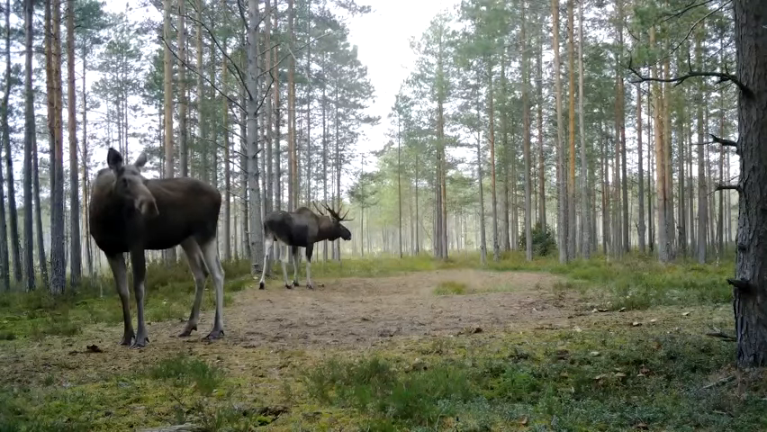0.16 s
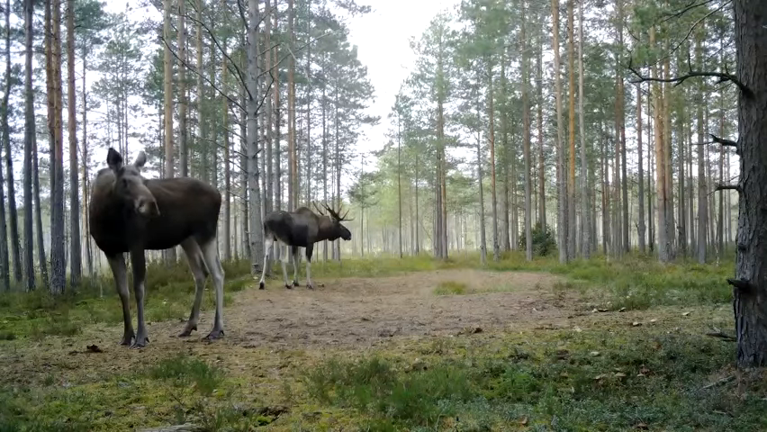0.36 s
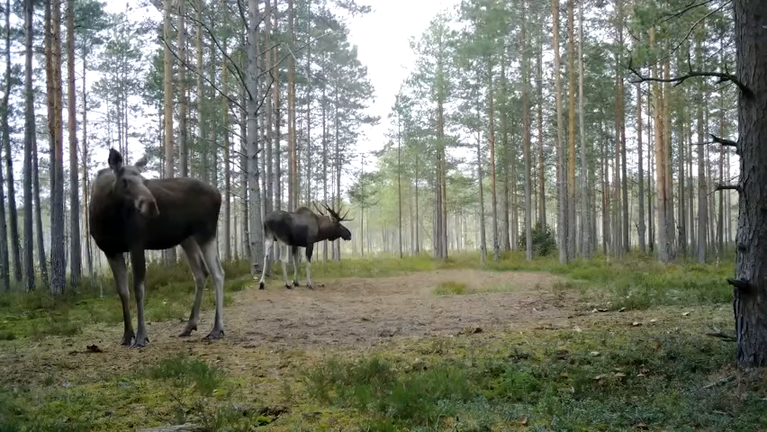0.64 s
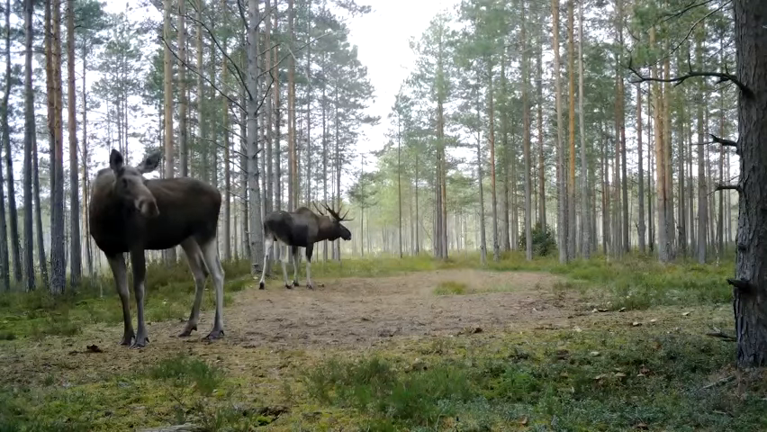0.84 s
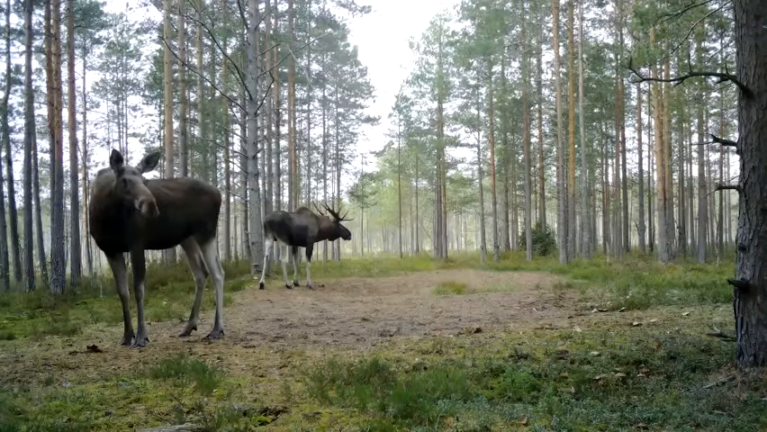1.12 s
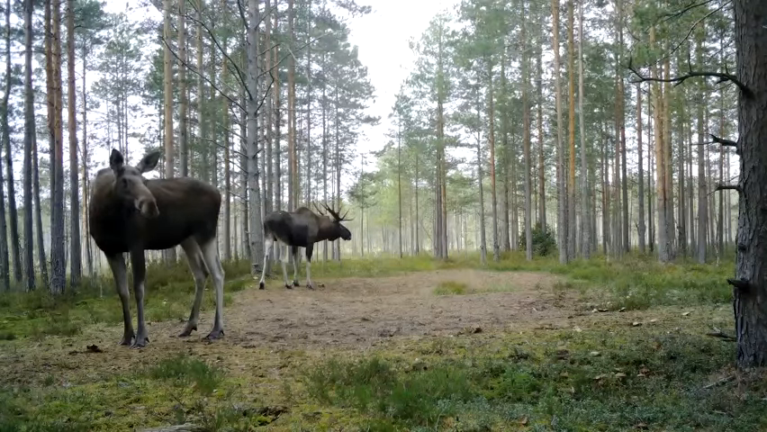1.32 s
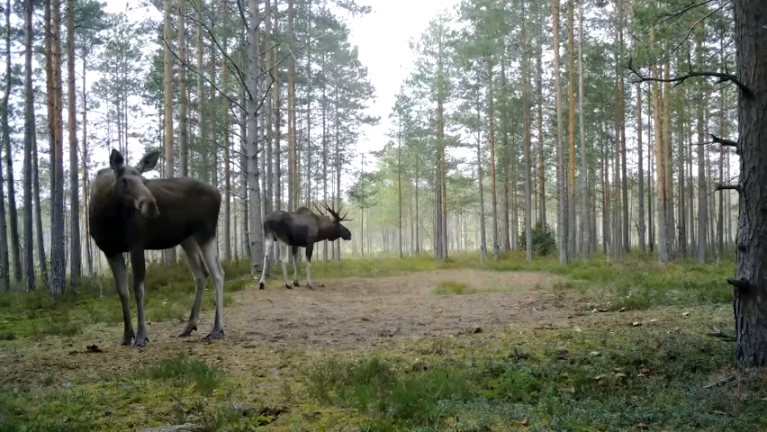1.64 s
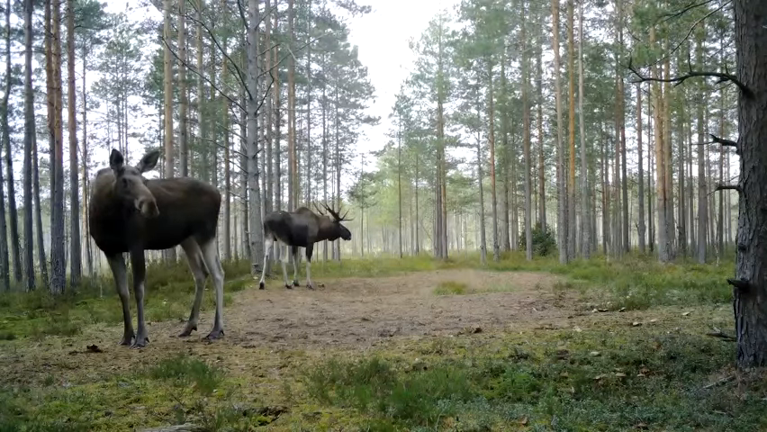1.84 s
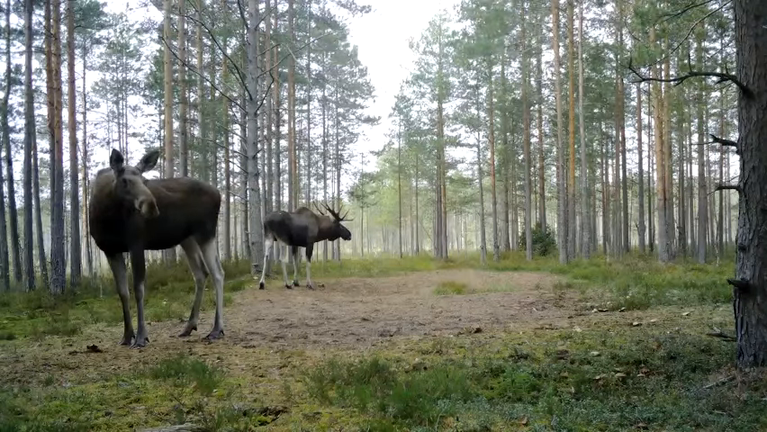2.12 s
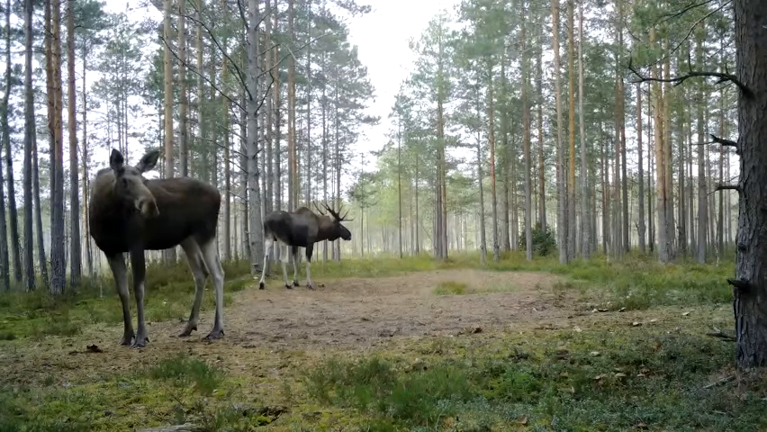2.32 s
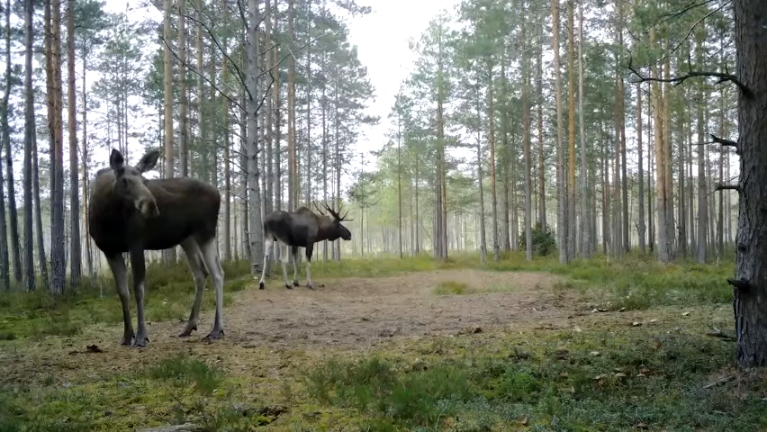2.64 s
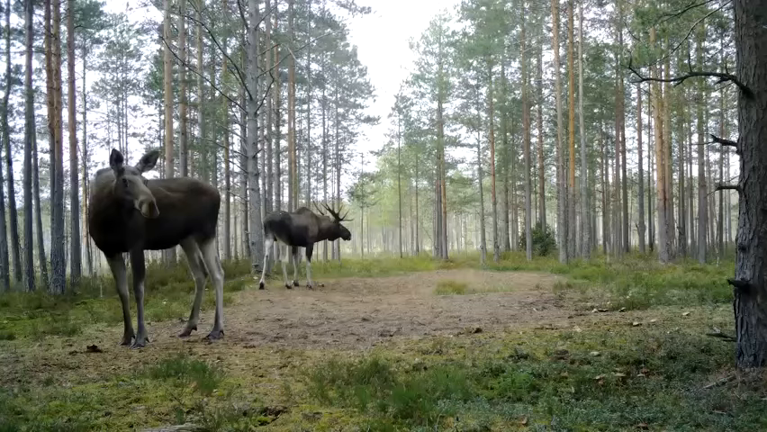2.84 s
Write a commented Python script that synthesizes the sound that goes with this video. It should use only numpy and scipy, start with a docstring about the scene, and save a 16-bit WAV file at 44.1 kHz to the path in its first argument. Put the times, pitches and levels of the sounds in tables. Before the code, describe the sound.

Low, lumpy wind noise dominates, pressing on the microphone in an open pine forest. Faint treetop hiss stays behind it, three brief hoarse croaks echo among trunks in the first half, and small ticks accompany late heavy thuds.

```python
"""Deep, lumpy wind buffets the microphone in a pine forest, while the tree crowns hush steadily with some hiss.
Three short rattling croaks, probably of a distant raven, ring among the trunks.
There are a few small ticks, the late ones clicks of the recorder's gain stepping after hard pushes of wind.
Wind, crowns and ticks are shaped noise; each croak is a row of noisy pulses sent through throat resonances.
The hardest pushes of wind overload the input and make the gain control duck."""
import sys
import numpy as np
from scipy import signal
from scipy.fft import rfft, irfft, next_fast_len
from scipy.io import wavfile
from scipy.ndimage import uniform_filter1d

SR = 44100
rng = np.random.default_rng(int(sys.argv[2]) if len(sys.argv) > 2 else 0)


def waveform_to_disk(signal):
    """Save audio, clipped to [-1, 1], as 16-bit WAV at the path in sys.argv[1]."""
    frames = np.transpose(np.atleast_2d(signal))
    scaled = np.clip(frames, -1, 1) * 32767
    samples = np.round(scaled).astype(np.int16)
    wavfile.write(sys.argv[1], SR, samples)


N = 130977   # length in samples


def amp(db):
    """Turns decibels into a gain."""
    return 10 ** (np.asarray(db, float) / 20)


def unit(x):
    """Scales a sound to an rms level of 1."""
    return x / np.sqrt(np.mean(x ** 2) + 1e-20)


def in_time(rows):
    """Draws straight lines between the points of a (time, value) table, giving one value per sample."""
    times_s, values = np.transpose(rows)
    return np.interp(np.arange(N) / SR, times_s, values)


def coloured(points, low_hz=0, high_hz=np.inf):
    """Noise with the given spectrum, falling away beyond its ends; optionally one slice of it."""
    size = next_fast_len(N)
    hz = np.maximum(np.arange(size // 2 + 1) * SR / size, 1)
    table = np.array(points, float)
    db = np.interp(np.log(hz), np.log(table[:, 0]), table[:, 1])
    # 24 dB per octave below the first point and above the last
    db -= 24 * np.maximum(np.log2(table[0, 0] / hz), 0)
    db -= 24 * np.maximum(np.log2(hz / table[-1, 0]), 0)
    in_slice = (hz >= low_hz) * (hz < high_hz)
    spectrum = rfft(rng.standard_normal(size)) * amp(db) * in_slice
    return irfft(spectrum, size)[:N]


def steady(x, span_s):
    """Evens out the slow chance swells of a narrow noise by dividing by its local rms level."""
    span = int(span_s * SR)
    power = uniform_filter1d(uniform_filter1d(x ** 2, span), span)
    return x / np.sqrt(power + 1e-12)


def resonance(x, hz, width_hz):
    """Rings at one pitch: a two-pole band-pass with a gain of about 1 at its top."""
    r = np.exp(-np.pi * width_hz / SR)
    feedback = [1, -2 * r * np.cos(2 * np.pi * hz / SR), r * r]
    return signal.lfilter([(1 - r * r) / 2, 0, (r * r - 1) / 2], feedback, x + 1e-18)


def forest():
    """Crowns and hiss: octave slices of noise that breathe slightly, partly together."""
    # overall colour of crowns and hiss: pitch_hz [Hz], relative_level_db [dB]
    forest_colour = [(200, -1.5), (320, 0.5), (450, -0.5), (640, 0.5), (880, -7), (1200, -8.5),
                     (1600, -10.5), (2200, -15.5), (3500, -18), (7000, -19), (10000, -22), (15000, -24.5)]
    level_db, patchy_db = -53, .8
    slow = [(.5, 0), (4, -3), (12, -9)]   # colour of the breathing: pitch_hz [Hz], relative_level_db [dB]
    together = unit(coloured(slow))
    out = np.zeros(N)
    for low_hz in 100 * 2. ** np.arange(9):
        breathing = together + .5 * unit(coloured(slow))
        out += coloured(forest_colour, low_hz, 2 * low_hz) * amp(patchy_db * breathing)
    return amp(level_db) * unit(out)


def ticks():
    """Tiny bursts of noise, each begun by a clean snap, that die at once in their own bands."""
    # small ticks, those from 2.3 s on clicks of the recorder's gain stepping after hard pushes:
    # start_s [s], level_db before the fade [dB], pitch_hz [Hz], width_hz [Hz],
    # t60_s, the time of the added fade to fall 60 dB [s]
    tick_list = [(.259, -60, 4200, 900, .03), (.262, -52, 1370, 400, .04), (0.388, -59.5, 8000, 9000, 0.13),
                 (1.021, -44.5, 7400, 3500, 0.014), (1.022, -65, 12100, 6000, .03),
                 (1.83, -54.5, 3370, 1500, 0.022), (1.868, -54.5, 8400, 3000, .02),
                 (1.999, -57, 10400, 2500, 0.018), (2.3595, -39, 1200, 1990, .015),
                 (2.361, -51, 7000, 7000, .015), (2.401, -48, 7500, 5000, .02),
                 (2.403, -48, 2100, 700, .02), (2.61, -45.5, 1990, 2500, 0.0094)]
    snap_weight = 2.67
    out, age_s = np.zeros(N + SR), np.arange(SR // 10) / SR
    for start_s, level_db, pitch_hz, width_hz, t60_s in tick_list:
        strike = rng.standard_normal(len(age_s)) + snap_weight * (age_s == 0)
        burst = unit(resonance(strike, pitch_hz, width_hz)) * amp(level_db - 60 * age_s / t60_s)
        first = int(start_s * SR)
        out[first:first + len(age_s)] += burst
    return out[:N]


def among_trunks(x):
    """The trunks throw a sound back as a dull, fading tail of noise-like echoes."""
    t60_s, level_db, cut_hz = .8, -11, 2000
    age_s = np.arange(SR) / SR
    tail = rng.standard_normal(SR) * amp(-60 * age_s / t60_s) * (age_s > .02)   # silent for the first 20 ms
    tail = signal.sosfilt(signal.butter(1, cut_hz, fs=SR, output="sos"), tail)
    tail = tail / np.sqrt(np.sum(tail ** 2))
    return x + amp(level_db) * signal.fftconvolve(x, tail)[:N]


def croaks():
    """Each pulse is a snap in a short puff of noise, over some breath, rung by the throat resonances."""
    # croaks: start_s [s], length_s [s], pulse_rate [pulses per s], upper_fade and lower_fade of the
    # resonances [dB per s], upper_peak_s, when the upper ones are strongest after the start [s]
    croak_list = [(.427, .18, 36.5, 10, 0, .08), (.838, .235, 38, 55, 30, .05),
                  (1.335, .215, 40, 90, -8, .015)]
    # throat resonances: pitch_hz [Hz], width_hz [Hz], then the rms level before fading
    # in each of the three croaks [dB]
    throat = [(810, 130, -69, -66, -67), (1020, 160, -69, -67, -65), (1170, 100, -60, -63, -62),
              (1420, 260, -73, -70, -67), (1660, 160, -68, -72, -70), (2260, 160, -72, -76, -78),
              (2610, 200, -66, -70, -76), (2800, 200, -71, -76, -66), (3250, 300, -80, -78, -67),
              (3580, 250, -75, -68, -68), (4030, 300, -78, -68, -68)]
    upper_from_hz, attack_s = 2000, .02
    puff_s, pulse_spread_db, jitter_s = .004, 2.0, .0008
    breath, snap_weight = .28, 1.6   # shares beside the puffs
    t, out = np.arange(N) / SR, np.zeros(N)
    for k, (start_s, length_s, pulse_rate, upper_fade, lower_fade, upper_peak_s) in enumerate(croak_list):
        chance, noise = rng.standard_normal((16, 2)), rng.standard_normal(N)
        puffs, snaps = np.zeros(N), np.zeros(N)
        for j in range(16):
            age_s = t - start_s - j / pulse_rate - jitter_s * chance[j, 0]
            # pulses past the end of the croak get no strength
            strength = (j / pulse_rate < length_s) * amp(pulse_spread_db * chance[j, 1])
            snaps[np.argmin(np.abs(age_s - puff_s))] = strength * snap_weight * np.sqrt(puff_s * SR) / 2
            puffs += strength * np.exp(-.5 * (age_s / puff_s - 1) ** 2)
        opening = np.clip((t - start_s) / attack_s + .5, 0, 1)
        closing = np.clip((start_s + length_s - t) / attack_s + 1, 0, 1)
        source = (noise * (puffs + breath) + snaps) * opening * closing
        # the upper resonances fade both ways from their peak, the lower ones tilt around the middle
        upper = amp(-upper_fade * np.clip(np.abs(t - start_s - upper_peak_s), 0, 1))
        lower = amp(-lower_fade * np.clip(t - start_s - length_s / 2, -1, 1))
        for n, (pitch_hz, width_hz, *levels_db) in enumerate(throat):
            rung = resonance(resonance(source, pitch_hz, width_hz), pitch_hz, width_hz)
            rung = unit(rung) * np.sqrt(length_s * SR / N)   # rms counted over the croak alone
            fading = upper if pitch_hz > upper_from_hz else lower
            out += (-1) ** n * amp(levels_db[k]) * rung * fading   # neighbours have opposite signs
    return among_trunks(out)


def wind():
    """Air pressure swings: noise in three low bands, the lower two rounded at a ceiling, with lumps at pushes."""
    # level curves of the slow swings and the quicker eddies (a low thud, a flutter above it),
    # before the ceiling and the pushes: time_s [s], level_db [dB]
    rumble_curve = [(0.0, -70), (0.03, -26.5), (0.72, -13.5), (0.74, -26), (0.83, -10.5), (1.1, -28),
                    (1.16, -7.5), (1.21, -25), (1.28, -10), (1.31, -30.5), (1.41, -18), (1.45, -31.5),
                    (1.63, -16), (1.69, -30.5), (1.79, -22.5), (2.14, -10.5), (2.22, -25), (2.24, -13),
                    (2.88, -23), (2.97, -26.5)]
    thud_curve = [(0.0, -29), (0.23, -22), (0.45, -34), (0.49, -33.5), (0.59, -26), (0.61, -20.5),
                  (0.84, -31.5), (0.88, -23.5), (0.92, -31), (1.13, -21), (1.35, -24), (1.48, -41),
                  (1.61, -31.5), (1.75, -69), (1.96, -15), (1.99, -26.5), (2.14, -23.5), (2.2, -50),
                  (2.27, -25), (2.49, 19), (2.56, -32.5), (2.71, -16), (2.75, -35), (2.97, -30.5)]
    flutter_curve = [(0.0, -44.5), (0.07, -42), (0.11, -36), (0.16, -52), (0.25, -28), (0.28, -52),
                     (0.31, -55), (0.37, -40.5), (0.45, -51), (0.5, -49), (0.56, -43.5), (0.62, -40),
                     (0.67, -43), (0.7, -29), (0.84, -52.5), (1.0, -34.5), (1.07, -39), (1.1, -52),
                     (1.15, -27.5), (1.19, -58), (1.23, -32), (1.45, -53.5), (1.55, -48), (1.6, -29.5),
                     (1.69, -57.5), (1.82, -52.5), (1.92, -27.5), (2.17, -41.5), (2.25, -60.5), (2.33, -17),
                     (2.41, -41.5), (2.47, -25), (2.56, -37.5), (2.61, -29), (2.66, -39), (2.7, -35.5),
                     (2.73, -43), (2.87, -40.5), (2.92, -56), (2.97, -56)]
    # colours of the three bands: pitch_hz [Hz], relative_level_db [dB]
    rumble_colour = [(10, 4.5), (16, -1.5), (28, -4), (42, -1.5), (60, -10), (100, -31.5)]
    thud_colour = [(30, -13), (50, -1), (70, -5.5), (95, -10), (140, -37)]
    flutter_colour = [(70, -14), (100, -1), (125, 0), (160, -8), (200, -17), (250, -27), (320, -36),
                      (400, -45)]
    # hardest single pushes: centre_s [s], pressure at the centre [full scale = 1],
    # spread_s of the bell shape before the rebound is taken off [s]
    pushes = [(.617, -.47, .005), (1.922, .40, .0022), (2.353, .56, .006), (2.414, -.46, .009),
              (2.481, .43, .003), (2.509, -.45, .006), (2.602, -.45, .008)]
    ceiling = .31   # for rumble and thud
    rebound, rebound_widths = 0.64, 2.02   # share of the opposite swing around a push, and its width
    t = np.arange(N) / SR
    rumble = amp(in_time(rumble_curve)) * steady(coloured(rumble_colour), 0.18)
    thud = amp(in_time(thud_curve)) * steady(coloured(thud_colour), 0.033)
    flutter = amp(in_time(flutter_curve)) * steady(coloured(flutter_colour), 0.071)
    out = rumble + thud
    size = np.abs(signal.hilbert(out, next_fast_len(N))[:N])
    # strong swings are pressed softly towards the ceiling, averaged over 10 ms
    out = out / (1 + uniform_filter1d((size / ceiling) ** 4, SR // 100)) ** .25
    for centre_s, pressure, spread_s in pushes:
        lump = np.exp(-.5 * ((t - centre_s) / spread_s) ** 2)
        around = np.exp(-.5 * ((t - centre_s) / spread_s / rebound_widths) ** 2)
        # the push takes over from the other swings
        out = out * (1 - around) + pressure * ((1 + rebound) * lump - rebound * around)
        flutter = flutter * (1 - lump)
    return out + flutter


def scene():
    """Adds all the sounds at one microphone."""
    return (forest() + ticks() + croaks() + wind())[None]


def record(dry):
    """The input clips; peaks over a threshold pull the gain down a moment later, and it climbs back."""
    overload, duck_from = .5, .36   # full scale = 1
    duck_ratio, recover_db_per_s = 1.7, 32   # the ratio is dB of ducking per dB over the threshold
    lag_s, attack_s, cutoff_hz = 0.0067, 0.00067, 15750
    clipped = np.clip(dry, -overload, overload)
    over_db = np.maximum(20 * np.log10(np.abs(dry[0]) / duck_from + 1e-9), 0)
    # hold the deepest ducking so far, less what has been recovered since
    climb_db = recover_db_per_s * np.arange(N) / SR
    held_db = np.maximum.accumulate(duck_ratio * over_db + climb_db) - climb_db
    lag = int(lag_s * SR)
    late_db = np.concatenate([np.zeros(lag), held_db[:N - lag]])
    r = np.exp(-1 / (attack_s * SR))
    duck_db = signal.lfilter([1 - r], [1, -r], late_db)
    top_cut = signal.cheby2(24, 60, cutoff_hz, fs=SR, output="sos")   # 60 dB down from the cutoff up
    return signal.sosfilt(top_cut, clipped * amp(-duck_db))


dry = scene()
out = record(dry)
waveform_to_disk(out)
```